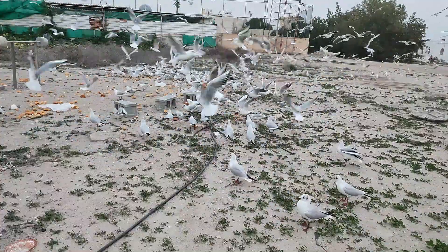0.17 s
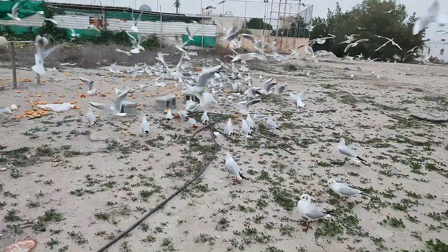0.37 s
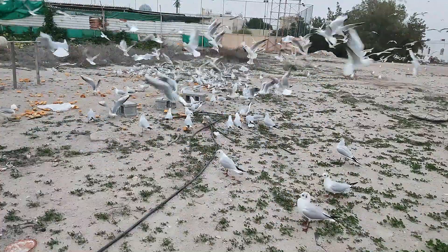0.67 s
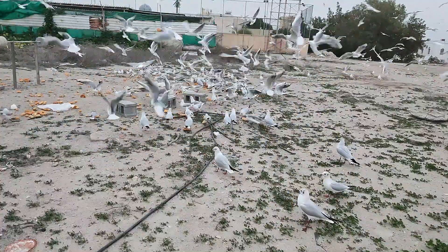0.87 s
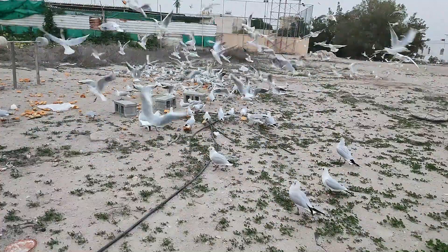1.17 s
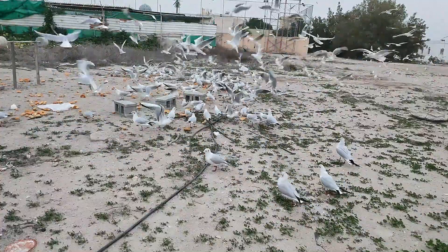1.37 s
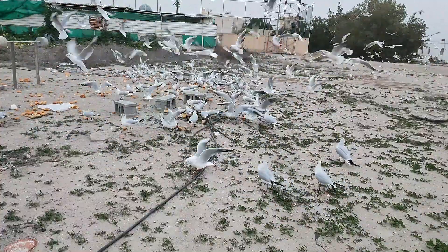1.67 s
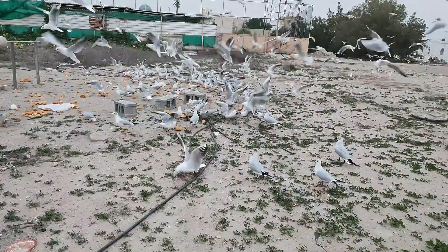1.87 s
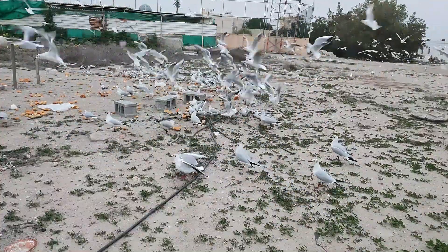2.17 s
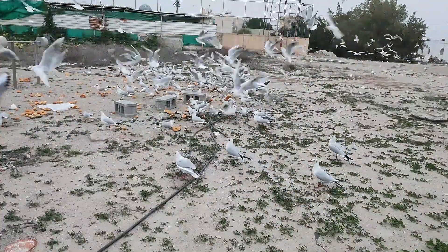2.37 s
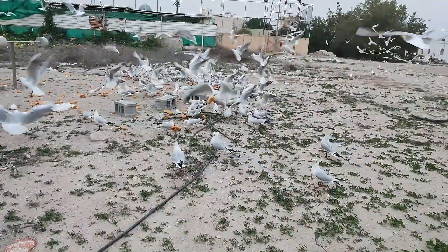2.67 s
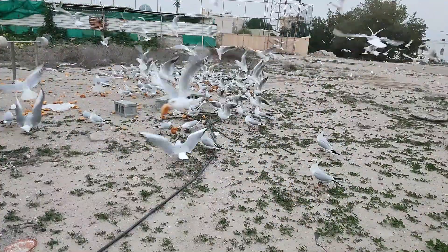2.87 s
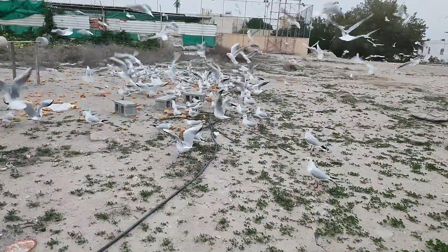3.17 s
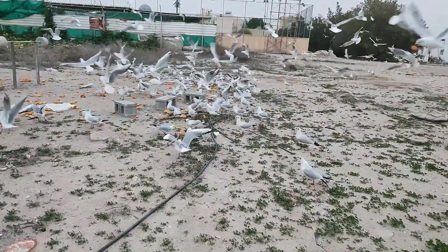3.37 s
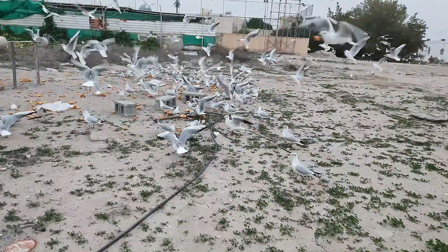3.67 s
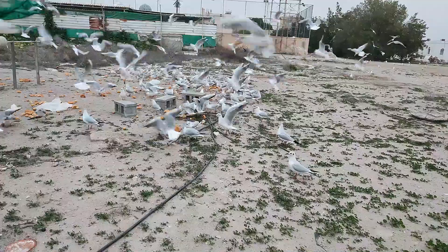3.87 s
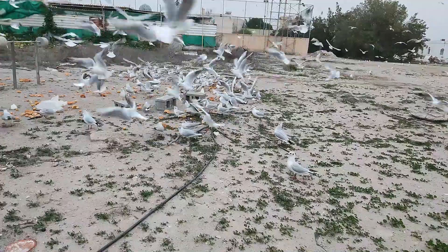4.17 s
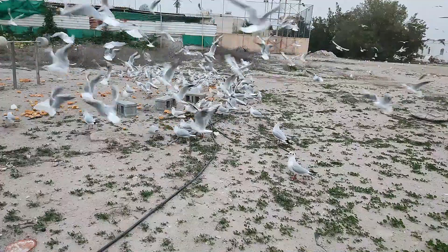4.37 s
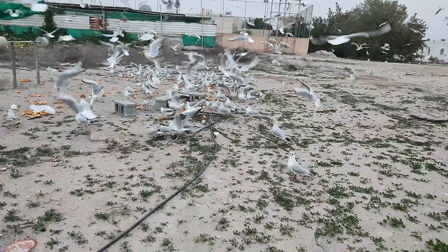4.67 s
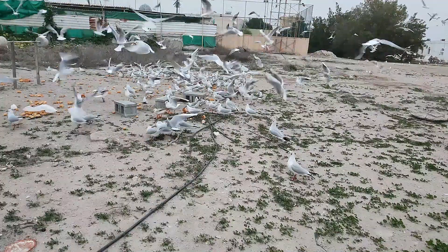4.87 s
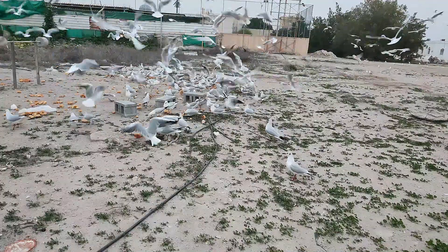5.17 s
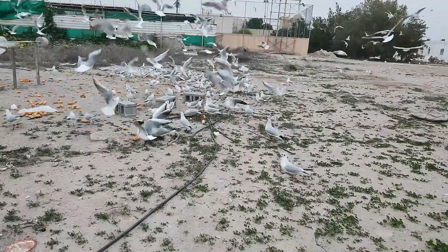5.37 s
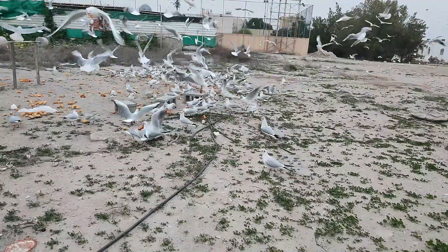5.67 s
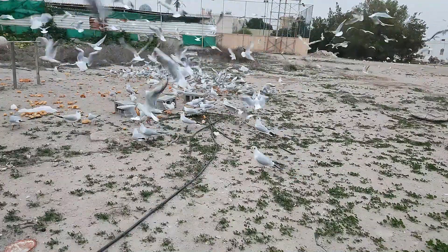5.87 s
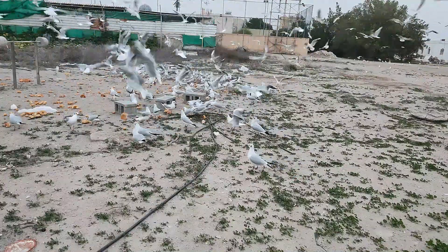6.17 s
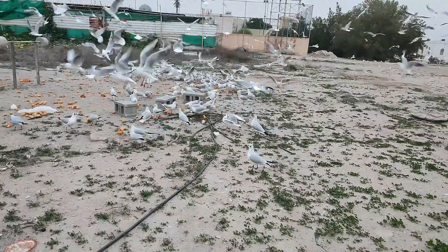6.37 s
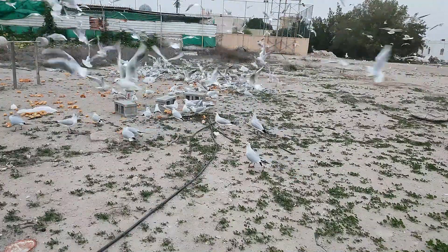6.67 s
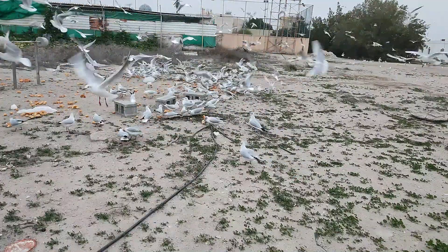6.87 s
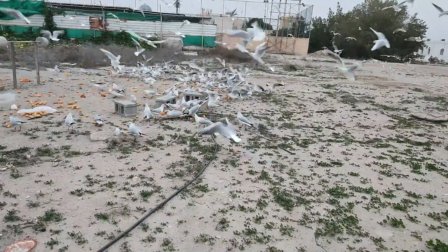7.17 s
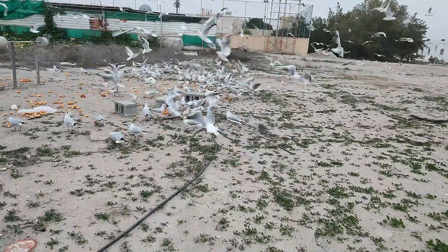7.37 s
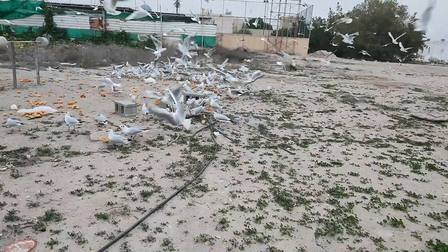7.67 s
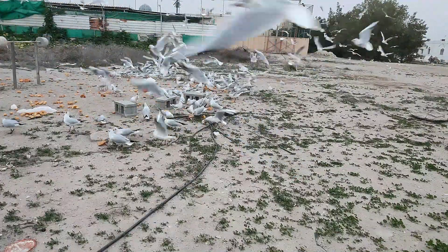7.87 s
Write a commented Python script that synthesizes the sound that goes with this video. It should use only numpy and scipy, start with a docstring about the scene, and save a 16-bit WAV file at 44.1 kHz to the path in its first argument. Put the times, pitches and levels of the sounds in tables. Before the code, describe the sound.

A large flock of small gulls feeds on open sandy ground a few metres from the microphone. Short, shrill, rasping cries overlap almost without gaps, near birds standing out from a babble of farther ones. Around the middle, longer bending squeals appear, then calls thin out. Soft wing puffs flutter through; low wind buffets the microphone early on, over faint traffic and a distant engine drone.

```python
"""Small gulls squabbling over food

A large flock on open sandy ground, heard from a few metres away, with wind rumbling on the microphone.
Each cry is a shrill arched tone near 1.2 kHz, a pulsing syrinx chopped into a fast rasping trill.
Near birds stand out of a wall of farther ones that join in with them; wings beat as soft puffs of noise.
Far traffic is low shaped noise, and a distant engine drones on its three lowest firing harmonics.
"""
import sys
import numpy as np
from scipy import signal
from scipy.fft import rfft, irfft, next_fast_len
from scipy.io import wavfile
from scipy.ndimage import uniform_filter1d

SR = 44100
rng = np.random.default_rng(int(sys.argv[2]) if len(sys.argv) > 2 else 0)


def log_audio(samples):
    """Write samples as a 16-bit WAV file to the path given in sys.argv[1]."""
    # one column per channel
    frames = np.atleast_2d(samples).T
    # limit to full scale, then quantise
    limited = np.clip(frames, -1, 1)
    pcm = np.round(limited * 32767).astype(np.int16)
    wavfile.write(sys.argv[1], SR, pcm)


N = 354123
TIME = np.arange(N) / SR


def from_db(db):
    """Decibels to gain."""
    return 10 ** (np.asarray(db) / 20)


def rms_one(x):
    """Scale to rms 1."""
    return x / np.sqrt(np.mean(x ** 2) + 1e-20)


def in_time(rows):
    """Each column of a curve, interpolated at every sample."""
    seconds, *columns = np.transpose(rows)
    return [np.interp(TIME, seconds, column) for column in columns]


def at_hz(points, hz):
    """Read a spectrum in dB on a log-frequency axis."""
    f, db = np.transpose(points)
    return np.interp(np.log(hz + 1), np.log(f), db)


def noise(spectrum):
    """Random noise with the given spectrum, rms 1."""
    size = next_fast_len(N)
    gain = from_db(at_hz(spectrum, np.fft.rfftfreq(size, 1 / SR)))
    shaped = irfft(rfft(rng.standard_normal(size)) * gain, size)
    return rms_one(shaped[:N])


def drift(rate_hz):
    """Smooth random wander at about the given rate, spread 1."""
    r = np.exp(-2 * np.pi * rate_hz / SR)
    wander = signal.lfilter([1], [1, -2 * r, r * r], rng.standard_normal(N + SR))
    return rms_one(wander[SR:])  # the first second lets the filter settle


def add(out, start_s, sound):
    """Mix a sound in at a time."""
    at = int(np.clip(start_s * SR, 0, N - 1))
    out[at:at + len(sound)] += sound[:N - at]


def unsteadiness():
    """What makes a syrinx uneven: fast pitch jitter, wandering trill rate, uneven bursts, turbulence."""
    return np.array([drift(460), drift(23.0), drift(59.0), rng.standard_normal(N)])


CRY_BEND = 0.03624  # a short cry starts and ends this share below its glide


def glide(hz, change):
    """First, middle and last pitch of a short cry: a slide with a slight arch."""
    return hz * np.array([1 - change / 2 - CRY_BEND, 1, 1 + change / 2 - CRY_BEND])


# A gull's voice before its throat resonance, falling away above the main peak,
# with a shoulder from 5 to 8 kHz. Each row: frequency in Hz, level in dB.
VOICE_SPECTRUM = [(600, -15.5), (1200, -19), (2000, -5), (3000, 0), (3900, 2), (4850, -2.5), (5350, -5),
                  (6200, -5.5), (7800, -6.5), (10000, -16.5), (12000, -24), (14000, -54)]
CHIRP, CHIRP_RISE = 0.1108, 0.027  # arch of pitch in each burst, and its rise from start to end: shares
TURBULENCE, JITTER = 2.16, 0.0788  # at full roughness: air noise against the tone; pitch jitter as a share
# Pairs: value in a clear cry, amount added at full roughness.
UNEVEN_DB = (1.68, 0.5)  # level scatter from burst to burst
UNEVEN_PITCH = (0.0073, 0.0333)  # pitch scatter from burst to burst, as a share
ATTACK_SHARE = (0.14, 0.14)  # rise time as a share of the length
THROAT_WIDTH_HZ = (262, 850)  # half width of the throat resonance
RELEASE_S = 0.11  # longest fade at the end of a cry
SAG_DB_PER_S = 6.5  # a bird loses force as its cry goes on
CLOSING_FALL = 0.42  # share of pitch lost when the beak has closed
CLOSED_THROAT, CLOSED_DB = 0.58, 9.5  # closed beak: its resonance as a share of the open one; its gain


def by_roughness(pair, rough):
    """A setting between its clear value and its fully rough one."""
    return pair[0] + pair[1] * rough


def through_throat(voice, hz, centre_hz, rough, size):
    """The throat is one resonance, broader in a harsh cry."""
    width_hz = by_roughness(THROAT_WIDTH_HZ, rough)
    return irfft(voice / np.hypot(1, (hz - centre_hz) / width_hz), size)


def cry(chance, length, contour_hz, trill_hz, level_db, throat_hz, bright_db, rough,
        fundamental_db=0, depth=0.894, chirp_size=CHIRP):
    """One cry: a pulsing syrinx, chopped by the trill, sounding through the throat."""
    t = np.arange(int(length * SR)) / SR
    u = t / t[-1]
    jitter, wander, uneven, turbulence = chance[:, :len(t)]

    # the trill shuts the airflow: a light trill only for an instant, a hoarse one less regularly
    beat = np.cumsum(trill_hz * (1 + 0.24 * rough * wander)) / SR
    opening = np.abs(np.sin(np.pi * beat))
    closure = np.sqrt(depth) * np.exp(-(opening / (0.53 * depth)) ** 4)
    bursts = (1 - closure) * from_db(by_roughness(UNEVEN_DB, rough) * uneven)

    # the pitch runs smoothly through its contour, and chirps in each burst
    degree = len(contour_hz) - 1
    arch = np.polyval(np.polyfit(np.linspace(0, 1, degree + 1), contour_hz, degree), u)
    chirp = chirp_size * (opening - .85) + CHIRP_RISE * (beat % 1 - .5)
    scatter = JITTER * rough * jitter + by_roughness(UNEVEN_PITCH, rough) * uneven
    pitch = arch * (1 + depth * chirp + scatter)

    # twelve equal harmonics make the syrinx pulses
    half_phase = np.pi * np.cumsum(pitch) / SR + 1e-4
    pulses = np.sin(25 * half_phase) / np.sin(half_phase) - 1
    source = (rms_one(pulses) + TURBULENCE * rough * turbulence) * bursts
    rise = np.clip(u / by_roughness(ATTACK_SHARE, rough), 0, 1) ** .7
    fade = np.clip((1 - u) / min(.3, RELEASE_S / length), 0, 1) ** .7
    source = source * rise * fade * from_db(-SAG_DB_PER_S * t)

    # a beak turned this way sends more treble
    size = next_fast_len(len(t) + 256)
    hz = np.fft.rfftfreq(size, 1 / SR)
    tilt_db = np.interp(hz, [1610, 2320, 4120, 5000, 6040, 8140, 11000],
                        [fundamental_db, 0, 0, bright_db + 0.5, bright_db, bright_db, min(bright_db, 0)])
    voice = rfft(source, size) * from_db(at_hz(VOICE_SPECTRUM, hz) + tilt_db)
    open_beak = through_throat(voice, hz, throat_hz, rough, size)
    closed_beak = through_throat(voice, hz, CLOSED_THROAT * throat_hz, rough, size)

    # as the pitch falls away at the end, the beak closes and the resonance sinks
    fall = 1 - arch / arch[len(t) // 2]
    closed = np.clip(fall / CLOSING_FALL, 0, 1) * (u > .5)
    closed = np.pad(closed, (0, size - len(t)), "edge")
    sound = (1 - closed) * open_beak + closed * from_db(CLOSED_DB) * closed_beak
    return from_db(level_db) * rms_one(sound)


# Far cries range between these pairs.
FAR_ROUGH, FAR_GLIDE = (0.061, 0.33), (-0.2233, 0.1199)  # roughness 0-1; pitch change as a share
FAR_BRIGHT_DB = (-17, 2.5)  # from facing away to facing the listener


def far_gulls(count=380):
    """Random cries of the same kind from all over the flock, evened to about rms 1 throughout."""
    out, chance = np.zeros(N), np.tile(unsteadiness(), 2)
    draws = rng.random((count, 10))
    for k, (when, long, high, loud, mouth, facing, harsh, place, slide, pace) in enumerate(draws):
        sound = cry(
            chance[:, int(place * N):],
            length=0.037 + .075 * long ** 2,
            contour_hz=glide(780 + 520 * high, np.interp(slide, [0, 1], FAR_GLIDE)),
            trill_hz=62 + 30 * pace,
            level_db=-9 * loud,
            throat_hz=1300 + 2500 * mouth,
            bright_db=np.interp(facing, [0, 1], FAR_BRIGHT_DB),
            rough=np.interp(harsh, [0, 1], FAR_ROUGH),
            fundamental_db=9.5)
        add(out, (k + when) / count * N / SR - .04, sound)
    return out / np.sqrt(uniform_filter1d(out ** 2, SR // 6) + 1e-9)


# Moments when the crowd and its wings fall quiet. Each row: centre in seconds, depth in dB.
LULL_MOMENTS = [(0.125, -1), (0.81, -1.5), (2.18, -5), (3.21, -1), (3.78, -1.5), (5.44, -13.5), (5.901, -3),
                (6.73, -1), (7.42, -1.5)]
LULL_S = 0.035  # half the length of a lull


def lull_db():
    """How far the flock's activity has sunk at each moment."""
    return sum(db * np.exp(-((TIME - s) / LULL_S) ** 2) for s, db in LULL_MOMENTS)


# The crowd behind. Each row: time in seconds, level in dB before lulls, outbursts and the voice mix.
CROWD_LEVEL = [(0.0, -26), (0.67, -29), (0.85, -25), (1.9, -25), (2.03, -26.5), (2.5, -27.5), (3.09, -30),
               (3.6, -27.5), (4.79, -27), (5.3, -29), (6.02, -34), (6.9, -31.5), (8.03, -32)]
# The farthest cries, merged into a babble. Each row: frequency in Hz, level in dB per Hz.
BABBLE_SPECTRUM = [(600, -31), (1100, -13), (1700, 3.5), (2550, -3.5), (3800, 4), (5300, -11), (8000, -33),
                   (14000, -67)]
FAR_CRIES_DB, BABBLE_DB = -1.32, -6  # against the crowd's level
JOIN_IN = 0.49  # share of the crowd that shouts along with each near cry
JOIN_S, MOOD_S = 0.069, 0.58  # averaging spans of an outburst and of the general mood


def crowd(near):
    """The rest of the flock: far cries over a merged babble, swelling with each outburst close by."""
    power = near ** 2 + 1e-4
    outburst = uniform_filter1d(power, int(JOIN_S * SR)) / uniform_filter1d(power, int(MOOD_S * SR))
    excitement = np.sqrt(1 - JOIN_IN + JOIN_IN * outburst)
    voices = from_db(FAR_CRIES_DB) * far_gulls() + from_db(BABBLE_DB) * noise(BABBLE_SPECTRUM)
    level_db = in_time(CROWD_LEVEL)[0] + lull_db()
    return from_db(level_db) * excitement * voices


# The puff of a downstroke. Each row: frequency in Hz, level in dB per Hz.
WING_SPECTRUM = [(150, -9), (350, -12.5), (620, 0.5), (1000, -3.5), (1600, 2), (3000, -26), (9000, -33),
                 (14000, -50)]
# Single close wing strokes. Each row: centre in seconds, level in dB.
CLOSE_FLAPS = [(.29, -40), (.93, -35), (1.86, -31.5), (2.65, -36), (3.62, -32), (4.499, -31.5),
               (7.54, -31.5), (7.758, -27.5)]
WINGS_IN_LULL = 0.97  # share of a lull's dB that the wings follow


def wings(flurry_db, flap_s, count=7):
    """Several birds flapping, now and then one close by: each downstroke is a soft puff of air."""
    strokes = 0
    for pace, start in rng.random((count, 2)):
        flaps_per_s = (3.2 + 2.5 * pace) * (1 + 0.1406 * drift(1))
        beat = np.cumsum(flaps_per_s) / SR + start
        strokes = strokes + np.maximum(np.sin(2 * np.pi * beat), 0) ** 6
    flurry = from_db(flurry_db + WINGS_IN_LULL * lull_db()) * rms_one(np.sqrt(0.07 + strokes))
    close = sum(from_db(db) * np.exp(-((TIME - s) / flap_s) ** 2) for s, db in CLOSE_FLAPS)
    return noise(WING_SPECTRUM) * np.hypot(flurry, close)


# Wind rumble at the microphone. Each row: frequency in Hz, level in dB per Hz.
WIND_SPECTRUM = [(8, 9.5), (14, -5), (25, 1), (45, -17.5), (80, -12.5), (300, -64.5)]
# Its rise and fall. Each row: time in seconds, level in dB before a fixed trim.
WIND_GUSTS = [(0.0, -27), (1.2, -28.5), (2.2, -21.5), (3.6, -22.5), (5.5, -38.5), (8.03, -60)]


def wind_rumble(trim_db):
    """Wind on the microphone: very low noise that follows the gusts."""
    return from_db(in_time(WIND_GUSTS)[0] + trim_db) * noise(WIND_SPECTRUM)


# Far traffic. Each row: frequency in Hz, level in dB per Hz.
TOWN_SPECTRUM = [(25, -7), (60, -3), (120, -1), (200, 1), (350, -3.5), (700, -1.5), (1500, -9), (5000, -52)]


def far_traffic(level_db):
    """Many distant vehicles merge into a steady low noise."""
    return from_db(level_db) * noise(TOWN_SPECTRUM)


# A distant vehicle speeding up and slowing.
# Each row: time in seconds, mean firing rate in Hz, mean level of the first harmonic in dB.
VEHICLE_RUN = [(0, 54, -50), (1, 63, -43), (2, 72.4, -44), (2.6, 79, -43), (3.5, 86.35, -47.5),
               (4.5, 83.3, -58.5), (5.3, 73, -55), (6, 58.5, -44), (6.7, 53.5, -44.5), (7.4, 55.04, -40),
               (8.03, 57.3, -36)]


def engine(second_db, third_db):
    """Far off, only the lowest firing harmonics arrive, wavering in the air."""
    hz, level_db = in_time(VEHICLE_RUN)
    phase = 2 * np.pi * np.cumsum(hz * (1 + .012 * drift(4.4))) / SR
    orders = np.sin(phase)
    orders = orders + from_db(second_db) * np.sin(2 * phase)
    orders = orders + from_db(third_db) * np.sin(3 * phase)
    return np.sqrt(2) * from_db(level_db + 2 * drift(1.8)) * orders


# Short cries of the nearest birds. Each row: start in seconds, length in seconds, pitch in Hz,
# glide as a share of the pitch, trill in Hz, level in dB, throat resonance in Hz, brightness in dB,
# roughness 0-1.
NEAR_CRIES = [(0.028, 0.071, 1077, -0.1, 85, -28, 2750, -6, 0.44),
              (0.165, 0.078, 935, 0.013, 78.3, -24, 2630, -12, 0.44),
              (0.219, 0.053, 1244, -0.15, 64, -31.5, 3500, 1, 0.23),
              (0.297, 0.037, 1080, 0.076, 95, -26.5, 3130, -27, 0),
              (0.336, 0.068, 980, 0.07, 80.6, -24.5, 2200, -21, 0.07),
              (0.371, 0.062, 1350, -0.03, 58, -33, 3900, -1, 0.36),
              (0.469, 0.04, 1190, -0.19, 69.6, -25, 3500, 0, 0),
              (0.506, 0.048, 970, -0.14, 91.6, -21, 2740, -30, 0.17),
              (0.547, 0.037, 1230, -0.03, 102, -25, 3320, -5, 0.4),
              (0.579, 0.043, 1220, -0.097, 70.4, -27, 3380, -3, 0.22),
              (0.662, 0.075, 1017, 0.038, 76.3, -21.5, 2740, -20, 0.16),
              (0.726, 0.055, 1410, -0.045, 67.5, -30.5, 3580, -10, 0.4),
              (0.731, 0.056, 902, -0.25, 63.7, -27, 1680, -15, 0.06),
              (0.829, 0.059, 1017, -0.035, 86, -24.5, 2900, -7, 0.4),
              (0.908, 0.048, 1223, -0.095, 69.6, -22, 3400, -5.5, 0.3),
              (0.939, 0.053, 982, -0.16, 94.5, -25, 2900, -21, 0.2),
              (0.979, 0.056, 1257, -0.03, 103, -31, 3500, 4, 0.1),
              (1.016, 0.097, 1074, 0.11, 82.5, -23, 2440, -27, 0.47),
              (1.154, 0.033, 1217, -0.11, 94, -27, 3340, 4, 0.3),
              (1.205, 0.047, 1276, -0.11, 59, -25, 3220, -1, 0.2),
              (1.277, 0.063, 1075, -0.01, 75.5, -26, 3280, -7, 0),
              (1.345, 0.051, 1195, 0.024, 79.5, -25, 2700, -1, 0.34),
              (1.382, 0.04, 1004, -0.093, 89, -22, 3150, -11, 0.15),
              (1.473, 0.03, 1290, -0.18, 62.2, -21.5, 3600, 0.5, 0.06),
              (1.507, 0.082, 1200, -0.14, 100, -27.5, 3650, 2.5, 0.14),
              (1.59, 0.041, 1186, -0.019, 66.4, -28.5, 4400, -8, 0.37),
              (1.637, 0.051, 1050, -0.07, 75.6, -28.5, 3200, -45, 0.55),
              (1.692, 0.068, 1172, -0.07, 102, -23.5, 3380, -0.5, 0.34),
              (1.755, 0.1, 1208, -0.17, 71.5, -28, 3580, 0.5, 0.29),
              (1.854, 0.071, 1103, 0.12, 88.4, -22, 3100, -5.5, 0.3),
              (1.933, 0.037, 1250, -0.1, 66, -21.5, 3850, 3, 0),
              (2.045, 0.082, 1167, -0.17, 92.3, -23.5, 3220, -3.5, 0.2),
              (2.211, 0.065, 1263, -0.07, 87.6, -24, 3550, 1.5, 0.03),
              (2.307, 0.045, 1010, -0.069, 67, -26, 2760, -7, 0.47),
              (2.364, 0.089, 1229, -0.064, 91, -22.5, 3670, -0.5, 0.25),
              (2.443, 0.089, 1027, -0.11, 57, -31, 2100, -5, 0.2),
              (2.614, 0.058, 1354, 0.059, 85.5, -22.5, 4080, -2.5, 0.19),
              (2.666, 0.081, 1268, 0.033, 71.4, -30.5, 3700, -2, 0.4),
              (2.745, 0.061, 1337, -0.029, 86.4, -25, 4160, -4, 0.08),
              (2.823, 0.054, 1137, 0.073, 67.5, -31, 3130, 2, 0.5),
              (2.923, 0.042, 1240, 0.019, 91, -29, 3700, -16, 0.15),
              (2.993, 0.06, 1164, -0.08, 86.5, -29.5, 3020, -3, 0.42),
              (3.109, 0.059, 1190, -0.027, 95, -27.5, 2540, -5, 0.42),
              (3.317, 0.03, 1180, -0.022, 75, -36, 4320, 15, 0.05),
              (3.613, 0.11, 1156, -0.00073, 76, -29.5, 3320, -21, 0.65),
              (3.827, 0.11, 1215, -0.063, 69, -33.5, 4300, -13, 0.5),
              (4.05, 0.12, 1112, 0.038, 58.5, -23, 2300, -7, 0.63),
              (4.189, 0.071, 1094, 0.067, 73, -26, 3550, -4.5, 0.42),
              (4.272, 0.027, 1024, -0.048, 88, -26, 3240, -4, 0.05),
              (4.332, 0.029, 1214, -0.04, 92, -28.5, 3470, 0.5, 0.06),
              (4.358, 0.1, 1052, -0.086, 90.2, -23, 2700, -5.5, 0.1),
              (4.453, 0.058, 1131, -0.066, 76, -27, 2300, -20, 0.48),
              (4.563, 0.055, 1180, 0.09, 60.8, -23.5, 3300, -6.5, 0.6),
              (4.702, 0.037, 1144, -0.064, 62, -21, 3300, -4, 0.03),
              (4.794, 0.11, 1162, 0.068, 101, -27.5, 3360, -4, 0.4),
              (4.991, 0.087, 1344, 0.012, 72, -27.5, 2610, -32, 0.37),
              (5.543, 0.071, 1160, 0.034, 99.6, -27, 3920, -11, 0.2),
              (5.735, 0.088, 993, -0.13, 79.4, -33, 2700, -22, 0.6),
              (6.014, 0.045, 1086, 0.055, 93, -33.5, 3300, -14, 0.3),
              (6.103, 0.037, 1055, -0.016, 59, -26.5, 3270, 0.5, 0.29),
              (6.321, 0.052, 987, -0.099, 64.7, -28.5, 2770, -4, 0.33),
              (6.473, 0.12, 1155, 0.075, 65, -30, 3330, -22, 0.47),
              (6.601, 0.069, 1114, -0.19, 85.6, -32, 2100, -9, 0.6),
              (6.789, 0.12, 900, -0.19, 83, -35, 3000, -18, 0.63),
              (7.075, 0.064, 1094, -0.02, 86, -30, 3600, -7.5, 0.37),
              (7.271, 0.092, 1124, -0.000019, 56.5, -26.5, 3560, -17, 0.35),
              (7.463, 0.043, 1040, 0.0052, 73, -35.5, 3000, 3, 0.42),
              (7.505, 0.072, 1046, -0.075, 82, -29, 2600, -8.5, 0.65),
              (7.672, 0.051, 1013, -0.09, 98, -24.5, 2600, -15, 0.11),
              (7.748, 0.032, 944, 0.042, 74.4, -22.5, 2230, -6, 0.36),
              (7.833, 0.021, 977, 0.056, 58, -33.5, 3400, 1, 0.1),
              (7.934, 0.031, 1066, 0.018, 71.4, -29, 3150, -5, 0)]
# Squeals, and one quick yelp, each with its own pitch bend, the beak wide open.
# Each row: start in seconds, length in seconds,
# first, early, late and last pitch in Hz, trill in Hz, level in dB, throat resonance in Hz,
# brightness in dB, roughness 0-1, fundamental lift in dB, trill depth 0-1,
# chirp in each burst as a share of the pitch (before the trill depth scales it).
NEAR_SQUEALS = [(1.254, 0.12, 1063, 1060, 1100, 1117, 84, -21.5, 2140, -30, 0.07, -3, 0.77, 0.075),
                (3.194, 0.1, 1330, 1172, 1130, 1140, 73.7, -34.5, 4000, 16, 0.1, -2, 1, 0.055),
                (3.281, 0.14, 1100, 1216, 1350, 1360, 78, -34.5, 2600, 5, 0.3, -3, 0.87, 0.111),
                (3.354, 0.11, 1364, 1278, 1213, 1244, 77, -27, 2480, -1.5, 0.14, -5.5, 0.48, 0.054),
                (3.434, 0.21, 870, 873, 836, 815, 61.3, -32, 2290, 1.5, 0.11, 9, 0.64, 0.13),
                (3.928, 0.21, 986, 1163, 1219, 1080, 70.7, -24, 2900, 5, 0.16, 8, 0.91, 0.21),
                (4.585, 0.18, 1208, 1242, 1168, 1023, 68.2, -25, 2400, 1, 0.2, 5, 0.55, 0.08),
                (4.861, 0.041, 1500, 1413, 1340, 1230, 89, -28, 2000, -17, 0.34, 44, 0.74, 0.096),
                (4.951, .24, 1154, 1338, 1290, 1245, 74.4, -27, 2900, 0, 0.19, 15, .85, .13),
                (5.162, 0.2, 1280, 1265, 1308, 1153, 72, -26.5, 2650, -2.5, 0.18, 15.5, 0.38, 0.057),
                (5.586, 0.2, 1296, 1332, 1338, 1340, 60.2, -32, 3900, 6.5, 0.09, 31.5, 0.52, 0.078),
                (6.777, .288, 915, 1329, 1271, 856, 63.1, -24.5, 3250, -4.5, 0.12, 4.5, 0.6, 0.087)]


def near_gulls():
    """The birds closest by: short sliding cries, and squeals that each bend their own way."""
    out, chance = np.zeros(N), np.tile(unsteadiness(), 2)
    for s, length, hz, change, *voice in NEAR_CRIES:
        add(out, s, cry(chance[:, int(s * SR):], length, glide(hz, change), *voice))
    for s, length, first_hz, early_hz, late_hz, last_hz, *voice in NEAR_SQUEALS:
        contour_hz = [first_hz, early_hz, late_hz, last_hz]
        add(out, s, cry(chance[:, int(s * SR):], length, contour_hz, *voice))
    return out


def yard(x, t60):
    """Scatter from the ground, sheds and trees: sparse random echoes in a thin, short tail."""
    t = np.arange(SR // 2) / SR
    sparse = (rng.random(len(t)) < .02) * (t > .003)
    echoes = rng.standard_normal(len(t)) * sparse * from_db(-60 * t / t60)
    return signal.fftconvolve(x, echoes / np.sqrt(np.sum(echoes ** 2)))[:N]


def scene():
    """Birds, air and town in the middle; only the treble of the birds spreads to the sides."""
    near = near_gulls()
    gulls = near + crowd(near)
    birds = gulls + from_db(-18.5) * yard(gulls, t60=0.16) + wings(flurry_db=-37.0, flap_s=0.031)
    wind = wind_rumble(trim_db=-2.5)
    town = far_traffic(level_db=-41.5) + engine(second_db=-8.5, third_db=-24.0)
    highpass = signal.ellip(10, .5, 100, 6100, "high", fs=SR, output="sos")
    treble = signal.sosfilt(highpass, birds)
    spread = from_db(-6.5) * yard(treble, t60=.08)
    return birds + wind + town + spread * np.array([[1], [-1]])  # opposite sign left and right


CUTOFF_HZ = 14200


def record(dry):
    """The sound opens softly and the top is cut steeply."""
    opening = np.clip(TIME / .006, 0, 1)
    lowpass = signal.ellip(10, .1, 80, CUTOFF_HZ, fs=SR, output="sos")
    return signal.sosfilt(lowpass, dry * opening)


dry = scene()
out = record(dry)
log_audio(out)
```